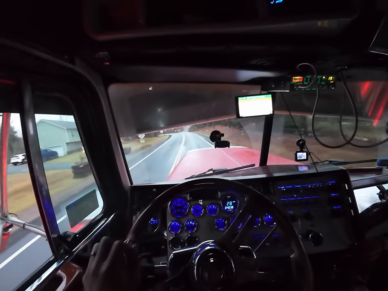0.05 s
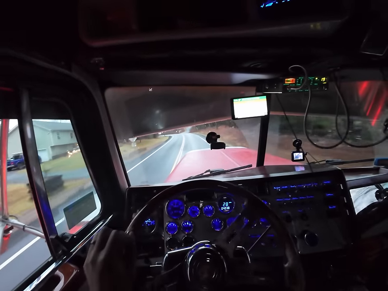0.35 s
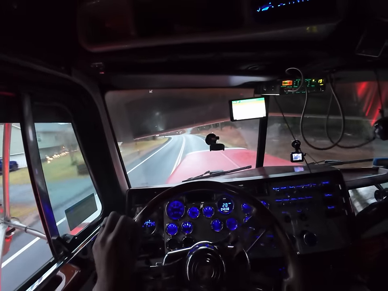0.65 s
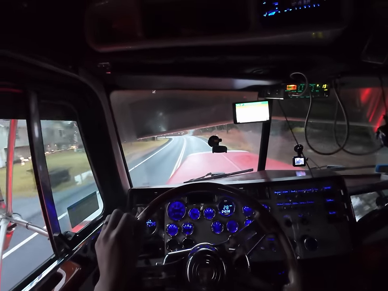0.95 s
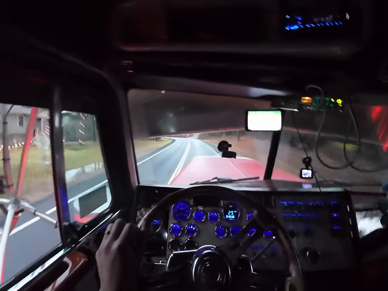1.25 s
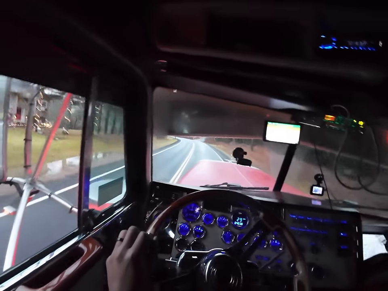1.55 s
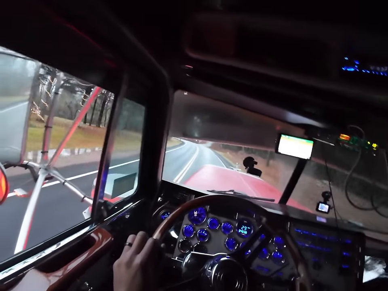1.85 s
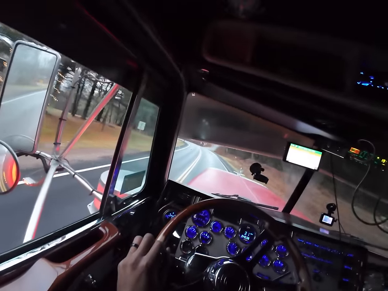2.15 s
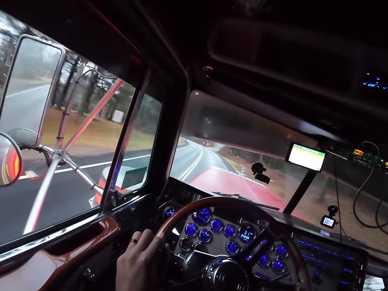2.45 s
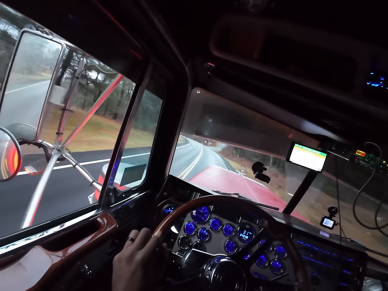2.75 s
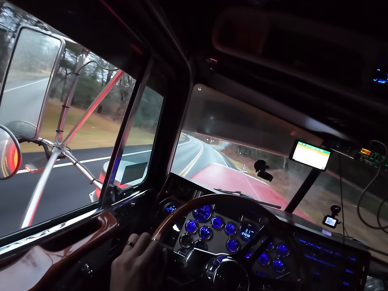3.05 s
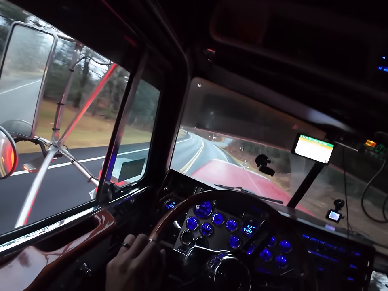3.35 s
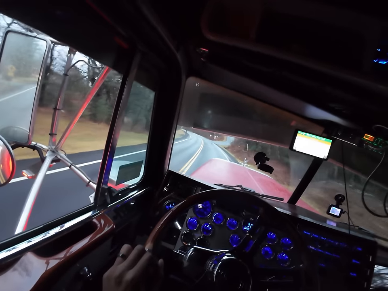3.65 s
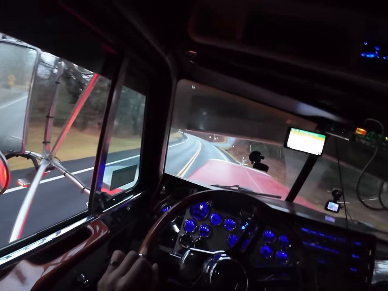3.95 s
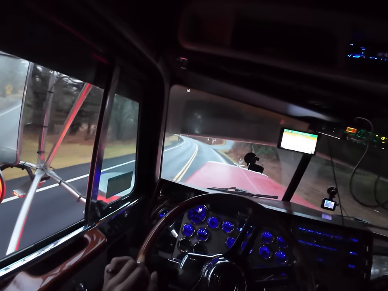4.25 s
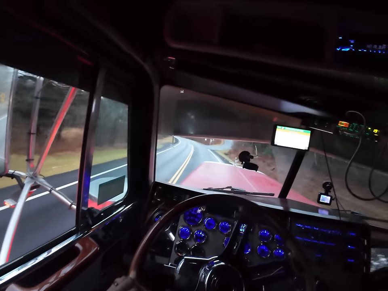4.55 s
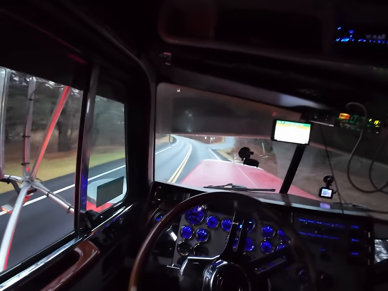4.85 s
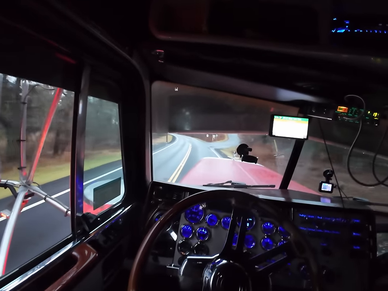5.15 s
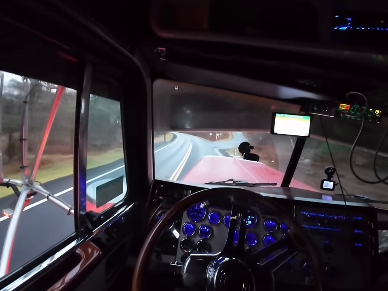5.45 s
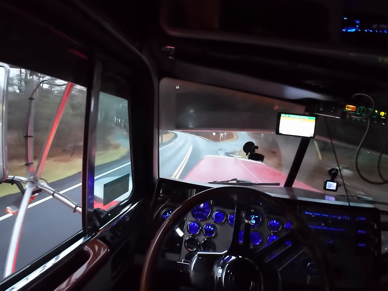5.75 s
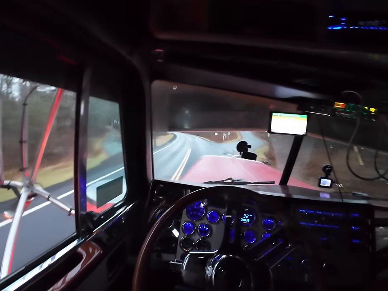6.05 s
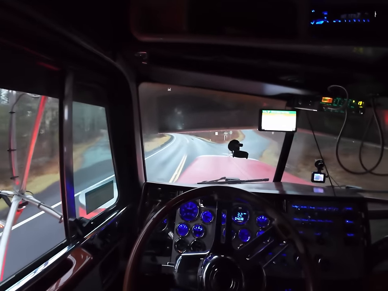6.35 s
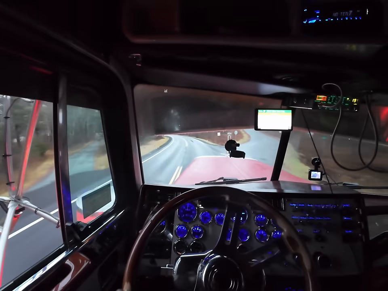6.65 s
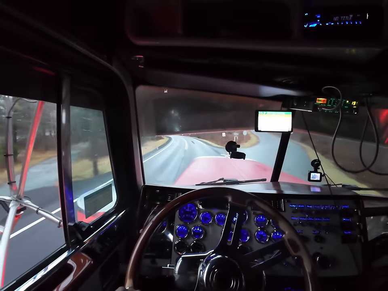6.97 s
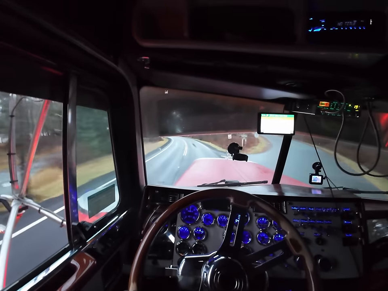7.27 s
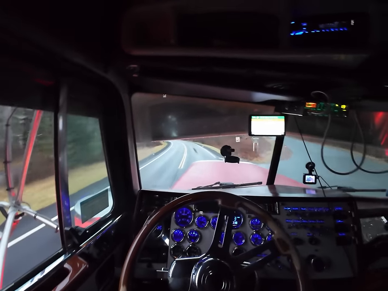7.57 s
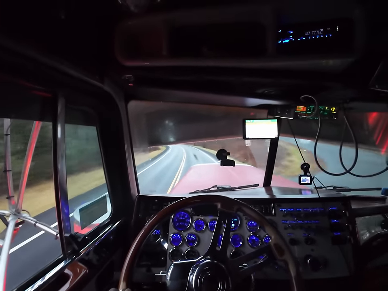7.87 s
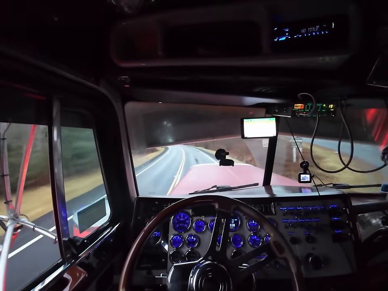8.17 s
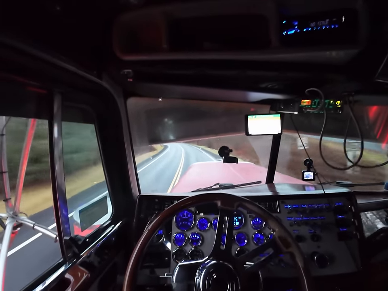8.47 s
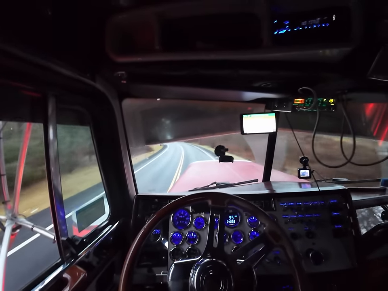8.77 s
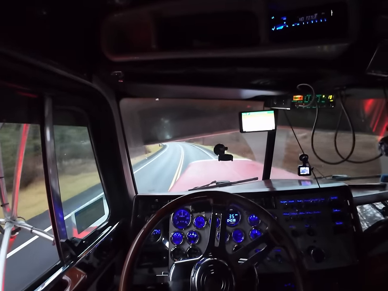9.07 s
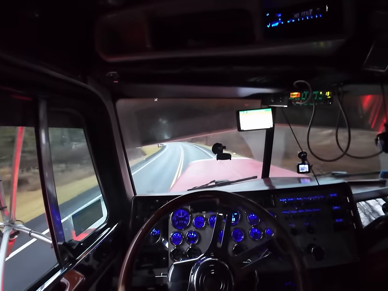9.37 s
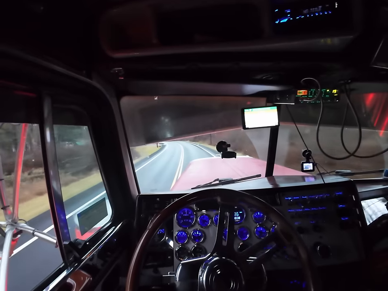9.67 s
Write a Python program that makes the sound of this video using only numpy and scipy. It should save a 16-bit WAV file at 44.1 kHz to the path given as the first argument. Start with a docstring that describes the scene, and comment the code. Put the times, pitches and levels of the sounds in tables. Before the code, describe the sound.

A heavy diesel truck is heard from the driver's seat while driving. From the start the engine pulls with a deep exhaust drone that swells into booms, with hard clatter through the cab wall and tyre and drive shaft rumble below. A very high, breathy turbo whistle and hiss rise above it during the first two seconds.

Near 3 seconds the engine eases off for a gear shift. Air sighs out, the engine note sinks a little and the whistle glides far down, standing out around 4.5 seconds. Loose gears rattle and give short falling whines while the road rumble grows.

At about 5 seconds the engine pulls again with a strong boom. The whistle climbs back until about 8 seconds, then sags slightly, as the engine slowly gains speed to the end near 10 seconds. Loudness stays fairly even, with other sounds dipping under each boom.

```python
"""Inside the cab of a heavy six-cylinder diesel truck. First it pulls: the exhaust booms, burning fuel
clatters through the cab wall, the turbo whistles and hisses, and the tyres and drive shaft rumble below.
Near 3 s it eases off for a gear shift: air sighs out, the engine and turbo drop in pitch, and loose gears
rattle and whine. Near 5 s it pulls again with a strong boom, and then the whistle climbs back up.
All along, an automatic volume control turns everything else down whenever the cab booms."""
import sys
import numpy as np
from scipy import signal
from scipy.fft import rfft, irfft, next_fast_len
from scipy.io import wavfile
from scipy.ndimage import uniform_filter1d, minimum_filter1d

SR = 44100
rng = np.random.default_rng(int(sys.argv[2]) if len(sys.argv) > 2 else 0)


def int16_out(signal):
    """Quantize to a 16-bit WAV file."""
    q = np.round(np.clip(np.atleast_2d(signal).T, -1, 1) * 32767)
    wavfile.write(sys.argv[1], SR, q.astype(np.int16))


N = 428652
TIME = np.arange(N) / SR
BIN_HZ = np.maximum(np.arange(N // 2 + 1) * SR / N, 1)
CYLINDERS, TURBO_FULL_HZ, CUTOFF_HZ = 6, 10160, 15700

# How much left and right differ, against what they share: pitch_hz, side_db
STEREO_WIDTH = [(60, -20), (110, -43), (200, -12.5), (380, -24.5), (700, -19.5), (1290, -16), (2380, -10.5),
                (4400, -4.5), (8120, 1.5), (15000, 5.5)]


def from_db(db):
    """Turn decibels into a number to multiply by."""
    return 10 ** (np.asarray(db) / 20)


def rms_one(x):
    """Scale a signal to an average power of 1."""
    return x / np.sqrt(np.mean(x ** 2) + 1e-20)


def in_time(points):
    """Join (time, value) points with straight lines, giving a value for every sample."""
    return np.interp(TIME, *np.transpose(points))


def at_hz(points, hz=BIN_HZ):
    """Read between (pitch, value) points, with every octave equally wide."""
    known_hz, values = np.transpose(points)
    return np.interp(np.log(hz), np.log(known_hz), values)


def colour(x, db):
    """Turn each frequency up or down by its own number of decibels."""
    size = next_fast_len(N + 4096)
    gain = np.interp(np.arange(size // 2 + 1) * SR / size, BIN_HZ, from_db(db))
    return irfft(rfft(x, size) * gain, size)[..., :N]


def drift(rate_hz):
    """A smooth random wobble of typical size 1; a higher rate wobbles faster."""
    step, warm_up = 20, 2000
    memory = np.exp(-2 * np.pi * rate_hz * step / SR)
    noise = rng.standard_normal(N // step + warm_up + 2)
    slow = signal.lfilter([1], [1, -2 * memory, memory ** 2], noise)[warm_up:]
    return np.interp(np.arange(N) / step, np.arange(len(slow)), rms_one(slow))


def turns_of(hz):
    """Count the cycles completed so far."""
    return np.cumsum(hz) / SR


def tone(turns, rough, spread_hz):
    """A tone with the share 'rough' of its power smeared into noise around its pitch."""
    angle = 2 * np.pi * (turns + rng.random())
    rough = np.clip(rough, 0, 1)
    steady, noisy = np.sqrt(2 * (1 - rough)), np.sqrt(rough)
    return (steady + noisy * drift(spread_hz)) * np.cos(angle) + noisy * drift(spread_hz) * np.sin(angle)


def in_cab(pair, spectrum):
    """Panels and glass colour two noises into left and right: alike in the bass, wide in the treble."""
    # Peaks and dips from the cab's panels: pitch_hz, width_hz, gain_db
    panels = [(396, 21, 0), (452, 33, -8.5), (479, 27, 6.5), (709, 30, 4.5), (785, 18, 5), (872, 48, 4.5),
              (1050, 26, 0), (1255, 225, -7), (1243, 28, 6.5), (1933, 32, 9.5), (3074, 67, -4.5),
              (6970, 540, -4.5)]
    # Short echoes off the glass, which make the treble ring: delay_s, gain
    echoes = [(.0023, .17), (.0041, -.15), (.0067, .14), (.0109, -.12)]
    panel_db = sum(peak_db / (1 + (2 * (BIN_HZ - hz) / width) ** 2) for hz, width, peak_db in panels)
    ripple = sum(gain * np.cos(2 * np.pi * BIN_HZ * delay) for delay, gain in echoes)
    treble = np.clip(BIN_HZ / 1500, 0, 1) ** 3
    db = at_hz(spectrum) + panel_db + 20 * np.log10(1 + ripple * treble)
    mid, side = colour(pair[0], db), colour(pair[1], db + at_hz(STEREO_WIDTH))
    return (mid + side * [[1], [-1]]) / np.std(mid)


def cab_boom_db(order, resting_db):
    """The level of one exhaust overtone: it swells, holds and fades as the cab rings along with it."""
    # Booms, each at full strength from its start: start_s, hold_s, order, level_db
    booms = [(0, 0.079, 18, -20), (0.453, 0.61, 12, -5), (1.353, 0.88, 24, -27), (1.95, 0.38, 18, -21.5),
             (2.35, 0.68, 11, -25), (3.25, 0.19, 9, -19), (4.88, 0.15, 12, -8.5), (5.297, 0.17, 12, -7.5),
             (5.605, 0.14, 18, -23.5), (5.876, 0.81, 14, -18), (6.82, 0.2, 18, -17.5),
             (7.308, .72, 12, -5.5), (8.948, 0.37, 24, -23), (9.2, .4, 18, -24)]
    rise_db_per_s, fall_db_per_s = 40, 51.5
    db = np.full(N, float(resting_db))
    for start, hold_s, boom_order, peak_db in booms:
        if boom_order == order:
            below_db = np.maximum(rise_db_per_s * (start - TIME), fall_db_per_s * (TIME - start - hold_s))
            db = np.maximum(db, peak_db - np.maximum(below_db, 0))
    return db


def exhaust(cycle, load):
    """Exhaust pulses hum, clean when pulling, ragged when coasting. An order is waves per engine cycle."""
    # The main note, one wave for each firing: time_s, level_db
    firing_level = [(0, -17), (.7, -18), (1.45, -25), (1.68, -27), (2.15, -19.5), (2.8, -16), (3.45, -32),
                    (3.72, -21), (3.95, -18), (4.65, -26), (4.95, -11.5), (5.22, -7), (5.6, -15),
                    (6.3, -14), (7.1, -15.5), (8.2, -20), (8.8, -16.5), (9.72, -15.5)]
    # Its main overtones between booms: order, level_db
    overtones = [(9, -32.5), (11, -34.5), (12, -22.5), (14, -35.5), (18, -31), (24, -31)]
    # Weaker tones from unequal cylinders and higher orders: order, level_db (added to weak_db)
    weak_tones = [(1, -18), (2, -4), (3, 5.5), (4, -11), (7, 1.5), (8, -1.5), (10, -12), (13, -5), (19, -3),
                  (20, -1), (22, -5), (23, -11.5), (25, -5.5), (29, -4.5), (30, -3), (36, -8.5), (42, -6.5),
                  (72, -12)]
    rough = 0.0075 + 0.41 * (1 - load) ** 2
    out = from_db(in_time(firing_level)) * tone(CYLINDERS * cycle, rough, spread_hz=7.7)
    for order, db in overtones:
        out += from_db(cab_boom_db(order, db)) * tone(order * cycle, rough, spread_hz=10.1)
    weak_db = -36.5 - 3 * (1 - load)
    for order, db in weak_tones:
        out += from_db(weak_db + db) * tone(order * cycle, rough=0.6 - 0.5 * load, spread_hz=3.0)
    return out


def engine_noise(cycle, repeat, fade_db, uneven_db):
    """Noise that fades by fade_db in each firing; the share 'repeat' comes back every engine cycle."""
    size = 3000
    patterns = rng.standard_normal((2, size))
    repeating = np.array([np.interp(cycle % 1 * size, np.arange(size), p - p.mean()) for p in patterns])
    noise = np.sqrt(repeat) * rms_one(repeating) + np.sqrt(1 - repeat) * rng.standard_normal((2, N))
    cylinder, age = np.divmod(CYLINDERS * (cycle % 1), 1)
    cylinder_db = uneven_db * rng.permutation(np.linspace(-1, 1, CYLINDERS))
    return noise * from_db(cylinder_db[cylinder.astype(int)] - fade_db * age)


def engine_block(cycle, firing_hz, load):
    """Burning fuel growls and knocks through the cab wall; when coasting, loose gears rattle too."""
    # Tone colour of the low growl: pitch_hz, level_db
    growl_colour = [(60, -3), (95, 6), (125, 10.5), (180, 4), (260, -4), (350, 4.5), (500, -0.5), (700, -6),
                    (1000, -11), (1400, -12.5), (2500, -64)]
    # Tone colour of the hard knock: pitch_hz, level_db
    knock_colour = [(500, -45), (900, 2.5), (1300, 5.5), (2000, -4), (3000, -5.5), (4200, -12.5),
                    (5600, -14), (7000, -23.5), (9500, -26), (12000, -32.5), (16000, -43)]
    # Tone colour of the gear rattle: pitch_hz, level_db
    rattle_colour = [(500, 0), (800, -7.5), (1020, 17), (1250, 5.5), (1700, -9.5), (2600, -0.5),
                     (3000, 4.5), (3400, -4.5), (4000, 1), (4400, -7.5), (5000, -10), (6200, -12.5),
                     (7200, -22.5), (12000, -45)]
    # Knock and rattle together: time_s, level_db
    clatter_level = [(0, -29), (1.5, -31), (3.4, -31.5), (4.27, -30.5), (4.37, -32), (4.5, -29.7),
                     (5.12, -30), (5.42, -35), (5.6, -31.5), (6.8, -28.5), (7.4, -30.5), (8.3, -31),
                     (9.72, -33)]
    growl = in_cab(engine_noise(cycle, repeat=0.5 * load, fade_db=1.5, uneven_db=1.4), growl_colour)
    knock = in_cab(engine_noise(cycle, repeat=0.14 * load, fade_db=3.0, uneven_db=0.96), knock_colour)
    rattle = from_db(4) * in_cab(engine_noise(cycle, repeat=0.18, fade_db=0, uneven_db=0), rattle_colour)
    slack = 0.52 * (1 - load)
    clatter = np.sqrt(1 - slack) * knock + np.sqrt(slack) * rattle
    clatter_db = in_time(clatter_level) + 0.5 * drift(12)
    growl_db = -20 - 0.02 * (firing_hz - 72.1)  # a touch quieter as the engine speeds up
    return from_db(growl_db) * growl + from_db(clatter_db) * clatter


def whistle(turns, hz, rough, spread_hz):
    """One turbo tone, reaching left and right by different paths."""
    mid = tone(turns, rough, spread_hz)
    side = tone(turns, rough, spread_hz) * from_db(at_hz(STEREO_WIDTH, hz) + 1.0)
    top_fade = np.clip((CUTOFF_HZ - hz) / 500, 0, 1)
    return (mid + side * [[1], [-1]]) * top_fade


def turbo(hz):
    """The turbo's air pump whistles, flutters with the gas flow and gets breathier as it spins faster."""
    # The whistle: time_s, level_db
    whistle_level = [(0, -50), (.65, -40.5), (1.4, -48), (2.1, -42.5), (2.6, -37), (2.94, -43),
                     (3.16, -38.5), (3.73, -42), (3.9, -43), (4.38, -48), (4.56, -31), (4.9, -67),
                     (5.55, -60), (5.86, -47), (6.85, -49.5), (7.1, -42.5), (8.65, -39), (9.72, -47.5)]
    # Higher tones, heard as they cross a pitch at which an air duct rings:
    # times_whistle_pitch, duct_hz, width_hz, level_db (against the whistle)
    duct_tones = [(1.45, 9500, 2200, -10), (1.45, 5980, 400, -10), (2, 14500, 1500, -7)]
    db = in_time(whistle_level)
    turns = turns_of(hz * (1 + 0.00342 * drift(29.5)))
    rough = np.clip(0.84 * (hz / TURBO_FULL_HZ) ** 2.1, 0, 1)
    flutter_db = 2.5 * drift(14)
    out = from_db(db + flutter_db) * whistle(turns, hz, rough, spread_hz=190)
    out += from_db(db - 3.5) * rough ** 2 * whistle(turns, hz, rough=1, spread_hz=560)  # breath
    for multiple, duct_hz, width_hz, tone_db in duct_tones:
        passed = np.exp(-((multiple * hz - duct_hz) / width_hz) ** 2)
        high_tone = whistle(multiple * turns, multiple * hz, rough=1, spread_hz=(duct_hz / 750) ** 2)
        out += from_db(db + tone_db) * passed * high_tone
    return out


def air_intake(turbo_hz):
    """Air hisses louder as the turbo spins faster, and escapes in one sigh as the driver eases off."""
    # Tone colour of the rushing air: pitch_hz, level_db
    hiss_colour = [(4000, -13), (6500, 9.5), (8000, 9), (10300, 8.5), (11300, -1), (12400, 6), (13100, 8),
                   (13800, 8.5), (14700, 1), (16000, 0.5)]
    sigh_s, sigh_width_s, db_per_khz = 3.15, 0.53, 0.4
    hiss_db = -47 + db_per_khz * (turbo_hz - TURBO_FULL_HZ) / 1000
    sigh_db = 7.5 * np.exp(-((TIME - sigh_s) / sigh_width_s) ** 2)
    gain = from_db(hiss_db + sigh_db + 0.61 * drift(10))
    return gain * in_cab(rng.standard_normal((2, N)), hiss_colour)


def tyres(road_db):
    """Tyres rolling on the road fill the cab with a deep rumble."""
    # Tone colour of the rumble: pitch_hz, level_db
    rumble_colour = [(3, -17), (12, 15), (20, 1), (30, -17), (39, 2), (48, 5.5), (57, -5), (75, -6),
                     (110, -1.5), (200, -17), (500, -76)]
    return from_db(road_db) * in_cab(rng.standard_normal((2, N)), rumble_colour)


def drive_line(load, road_db):
    """The shaft to the wheels hums, most when it runs slack; gears whine briefly as the pull changes."""
    # Gear whines: start_s, end_s, start_hz, end_hz, level_db
    whines = [(-.2, 0.308, 1270, 1290, -36.5), (0.251, 1.31, 853, 876, -32.5),
              (3.05, 3.499, 1050, 898, -35), (3.422, 3.76, 900, 794, -28), (4.102, 4.564, 338, 322, -25),
              (4.203, 5.11, 572, 544, -31.5), (6.3, 7.408, 2000, 2005, -43)]
    shaft_hz, shaft_db = 46.8, road_db + 1 - 6.5 * load
    out = from_db(shaft_db) * tone(shaft_hz * TIME, rough=0.083, spread_hz=1.73)
    for start, end, start_hz, end_hz, db in whines:
        progress = np.clip((TIME - start) / (end - start), 0, 1)
        swell = np.sqrt(np.abs(np.sin(np.pi * progress)))
        hz = start_hz + (end_hz - start_hz) * progress
        out += from_db(db) * swell * tone(turns_of(hz), rough=0.76, spread_hz=12)
    return out


def scene():
    """Engine, turbo and road as heard from the driver's seat."""
    # Engine speed: time_s, firings_per_s
    engine_speed = [(0, 72.9), (0.4, 73.6), (0.7, 75.2), (1.6, 78.9), (2.2, 80.6), (2.8, 80.3), (3.2, 77),
                    (3.5, 73), (3.7, 68.3), (4, 66.6), (4.9, 68.1), (5.15, 69.8), (5.3, 68.7), (5.5, 70),
                    (5.8, 68.8), (7.1, 72.1), (8.3, 76.5), (9.72, 79.2)]
    # How hard the engine works: time_s, load (0 coasting, 1 pulling fully)
    throttle = [(0, 0.98), (2.5, 0.93), (2.9, 0.8), (3.7, 0.07), (4.7, 0.37), (5.1, 0.94), (9.72, 0.93)]
    # Turbo speed, heard as its whistle: time_s, pitch_hz
    turbo_speed = [(0, 8480), (.4, 9820), (1, 10600), (1.7, 10930), (2.4, 10580), (2.7, 9900), (3, 8550),
                   (3.4, 6420), (3.75, 5320), (4.15, 4450), (4.5, 4060), (5.25, 3560), (5.6, 4560),
                   (6.1, 6200), (6.5, 7700), (7, 9370), (7.4, 10100), (7.95, 10280), (8.8, 9830),
                   (9.72, 8700)]
    # Road rumble: time_s, level_db
    road_level = [(0, -19.5), (.5, -20.5), (1.3, -30), (2.55, -20.5), (3, -18.5), (3.9, -12.5), (4.25, -16),
                  (4.45, -12.5), (5.15, -11), (5.6, -31), (6.1, -21), (8.15, -24), (9.3, -17), (9.72, -18)]
    firing_hz, load = in_time(engine_speed), in_time(throttle)
    turbo_hz, road_db = in_time(turbo_speed), in_time(road_level)
    cycle = turns_of(firing_hz) / CYLINDERS  # each cylinder fires once per engine cycle
    engine = exhaust(cycle, load) + engine_block(cycle, firing_hz, load)
    rumble = tyres(road_db)
    return engine + turbo(turbo_hz) + air_intake(turbo_hz) + rumble + drive_line(load, road_db)


def volume_control(x):
    """Turn loud moments down and quiet ones up, most of the way to a target level."""
    target_db, share, window_s = -8.5, 0.78, 0.074
    power = uniform_filter1d(np.mean(x ** 2, axis=0), size=int(window_s * SR))
    level_db = uniform_filter1d(10 * np.log10(power + 1e-9), size=int(window_s * SR))
    return x * from_db(share * (target_db - level_db))


def limiter(x):
    """Turn the sound down fast at peaks above a ceiling, then let it come back."""
    ceiling, release_db_per_s = 0.86, 70
    over_db = np.maximum(20 * np.log10(np.abs(x).max(axis=0) / ceiling + 1e-9), 0)
    release_db = release_db_per_s * TIME
    held_db = np.maximum.accumulate(over_db + release_db) - release_db
    gain_db = uniform_filter1d(minimum_filter1d(-held_db, size=129), size=129)
    return x * from_db(gain_db)


def record(dry):
    """Two microphone openings colour the sound; the level is evened out and the highest treble is cut."""
    # How much louder the left side is than the right: pitch_hz, difference_db
    balance = [(100, 0.48), (1000, .5), (2400, 0.5), (4400, 3), (8000, -1), (15000, -3.5)]
    half_db = at_hz(balance) / 2
    stereo = np.array([colour(dry[0], half_db), colour(dry[1], -half_db)])
    treble_cut = signal.ellip(12, .1, 90, CUTOFF_HZ, fs=SR, output="sos")
    return signal.sosfilt(treble_cut, limiter(volume_control(stereo)))


dry = scene()
out = record(dry)
int16_out(out)
```